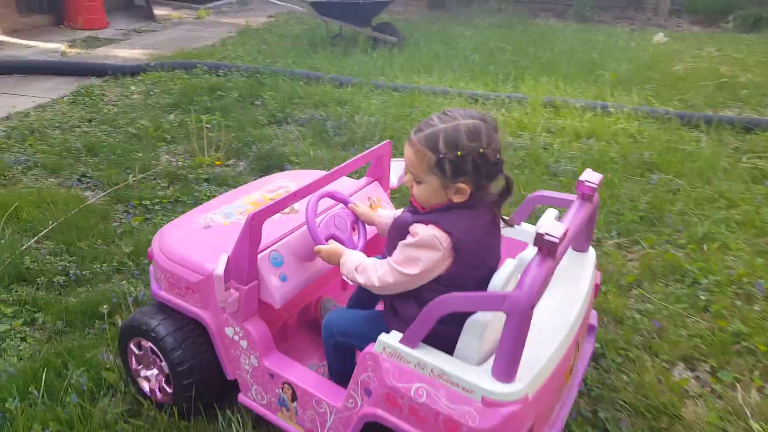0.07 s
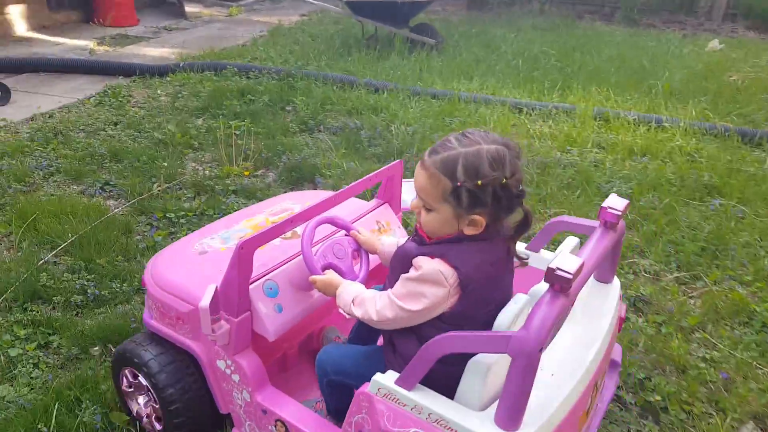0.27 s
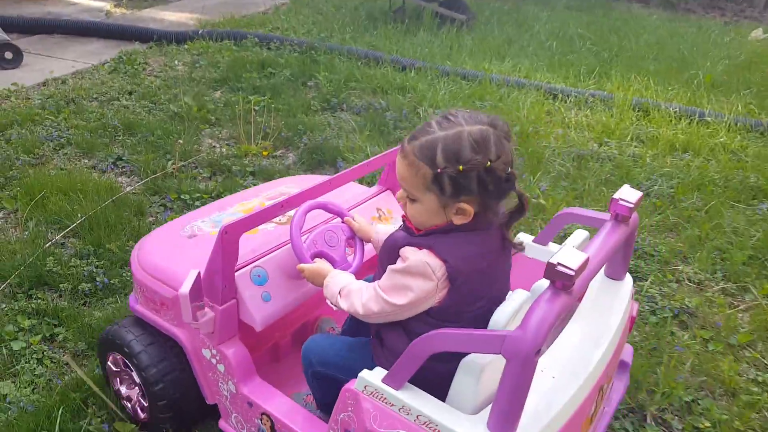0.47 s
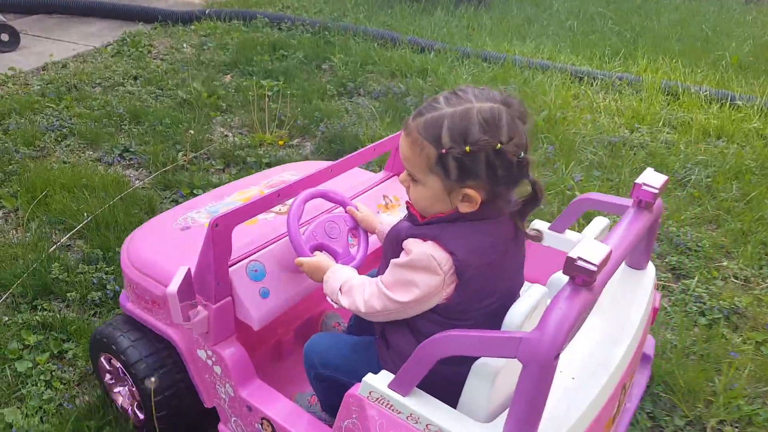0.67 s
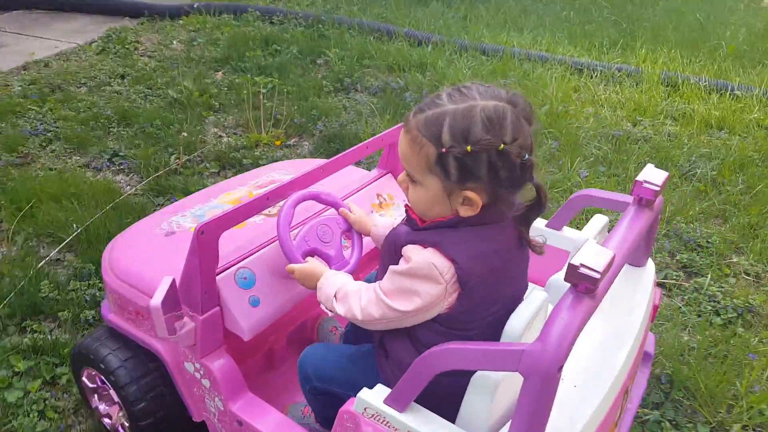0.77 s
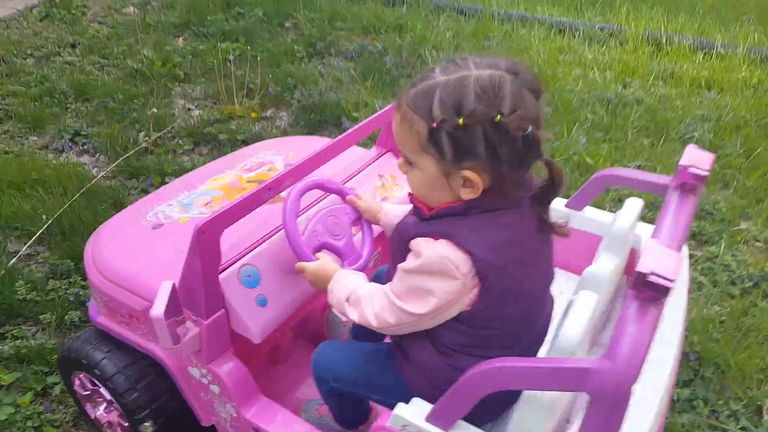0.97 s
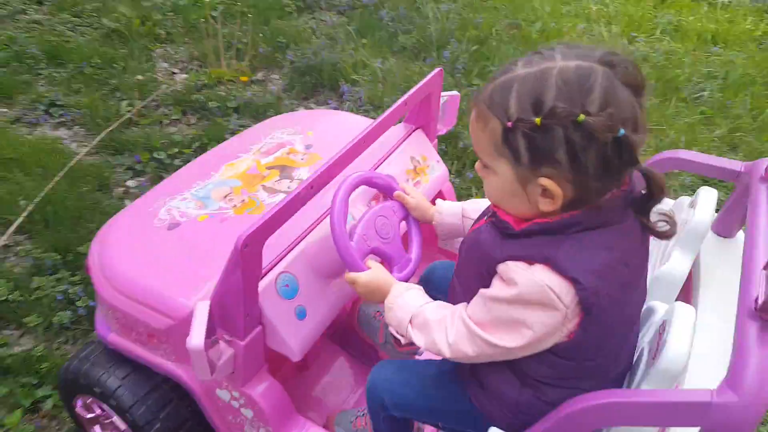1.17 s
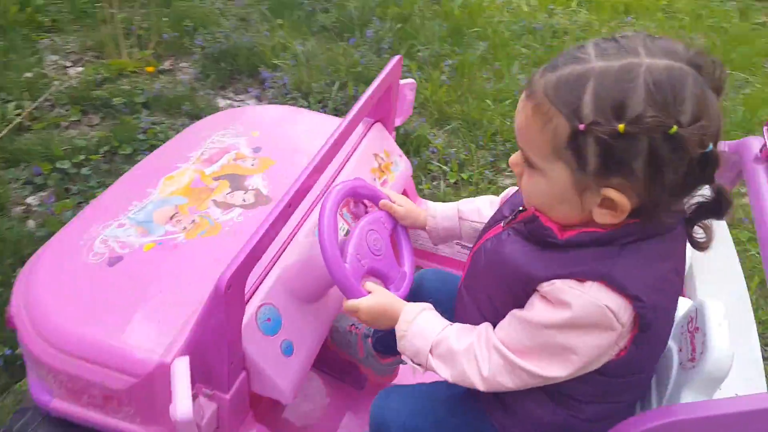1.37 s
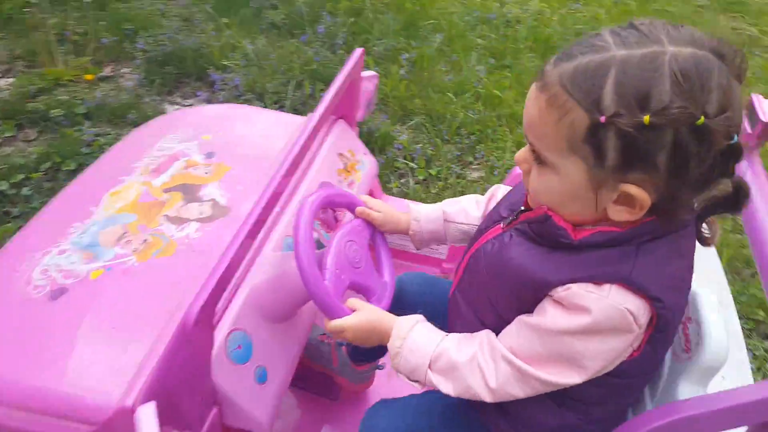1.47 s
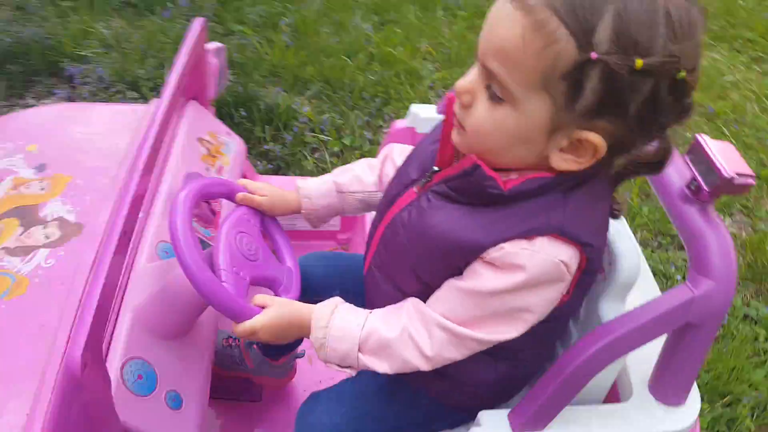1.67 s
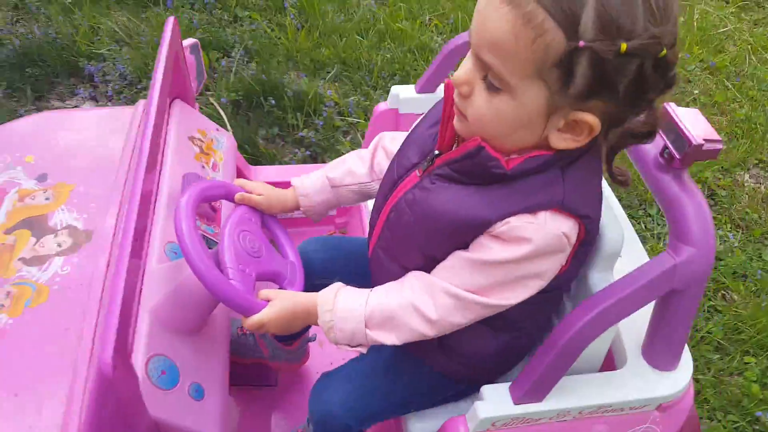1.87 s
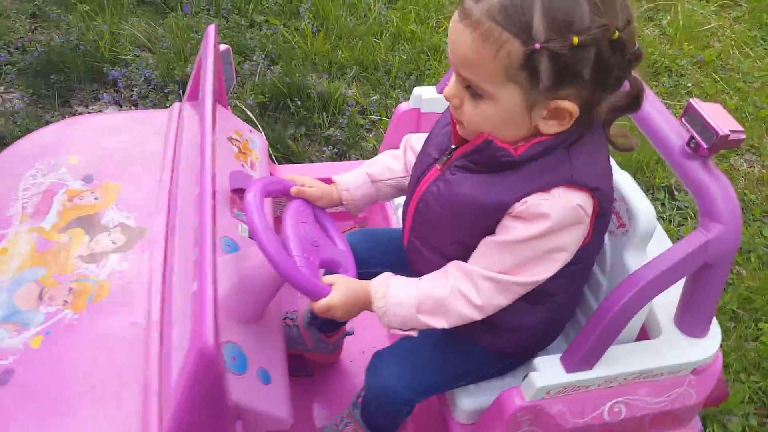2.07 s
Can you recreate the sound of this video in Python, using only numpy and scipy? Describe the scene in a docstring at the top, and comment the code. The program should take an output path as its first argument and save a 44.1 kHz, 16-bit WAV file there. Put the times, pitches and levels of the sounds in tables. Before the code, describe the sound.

Close by on a lawn, an electric toy car's motors whine up and down in short spurts. It rolls to a stop with a few plastic knocks, then drives off more roughly, its hollow body thumping near the end.

```python
"""A battery ride-on toy car on a lawn, close to a stereo pair of microphones in faint outdoor air.
First, five short jabs make its two motors whirr up and coast down: each gearbox whines at two tooth
rates, its teeth rattle in the plastic shell, and the wheels rumble over the grass. The car rolls to a
halt with a few knocks. At 1.4 s it pulls away in a longer, rougher run, and near the end the hollow
plastic body thumps."""
import sys
import numpy as np
from scipy import signal
from scipy.fft import rfft, irfft
from scipy.io import wavfile

SR = 44100
rng = np.random.default_rng(int(sys.argv[2]) if len(sys.argv) > 2 else 0)


def to_wav(s):
    """Save 16-bit WAV."""
    ch = np.atleast_2d(s).T  # columns
    pcm = np.round(np.clip(ch, -1, 1) * 32767)  # PCM
    wavfile.write(sys.argv[1], SR, pcm.astype(np.int16))


N = 93800
T = np.arange(N) / SR
FREQS = np.maximum(np.fft.rfftfreq(N, 1 / SR), 1)

# jabs of power: start/s, at speed/s, release/s, top tooth rate/Hz, level/dB, slowing/s, pinion whine/dB
POWER_JABS = [(.045, .080, 0.089, 2328, -24, 0.07, 0), (.205, .258, 0.28, 2148, -26.5, .056, 1.5),
              (.365, .420, 0.47, 2044, -26, 0.069, 2), (0.527, .570, .611, 1799, -25, .075, -0.5),
              (0.699, .745, 0.77, 2052, -23.5, 0.054, 0)]


def from_db(db):
    """Decibels to gain."""
    return 10 ** (np.asarray(db) / 20)


def rms_one(x):
    """Scale to unit rms."""
    return x / np.sqrt(np.mean(x ** 2) + 1e-20)


def in_time(rows):
    """Each column of a curve, sample by sample."""
    times, *columns = np.transpose(rows)
    return [np.interp(T, times, c) for c in columns]


def at_hz(rows, hz):
    """Each column of a spectrum at the given frequencies."""
    freqs, *columns = np.transpose(rows)
    return [np.interp(np.log(hz), np.log(freqs), c) for c in columns]


def drift(rate_hz):
    """Smooth random wander of unit rms."""
    return rms_one(irfft(rfft(rng.standard_normal(N)) / (1 + (FREQS / rate_hz) ** 2), N))


def colour(x, spectrum):
    """Give a white signal a spectrum, at unit rms."""
    return rms_one(irfft(rfft(x) * from_db(at_hz(spectrum, FREQS)[0]), N))


def microphones(direct, scattered=None):
    """A sound at the close stereo pair; its scattered part differs between left and right."""
    image = [(60, 0.89, 1.5), (200, 1, 1), (500, 0.93, 1.4), (1000, 0.79, 0.5), (1770, 0.31, 5),
             (3280, 0.2, 1.5), (4870, .2, -5), (7500, .15, -2.5), (13000, 0.14, 5)]  # stereo image: f/Hz, likeness of the sides, left minus right/dB
    phase = [(200, 0), (500, -.1), (1000, -.5), (1800, -1.3), (3300, -2.8), (5000, -1.5), (13000, -1.5)]  # phase between the sides: f/Hz, left lead/rad
    (alike, pan_db), (lead,) = at_hz(image, FREQS), at_hz(phase, FREQS)
    alike, sides = np.clip(alike, 0, 1), np.array([[1], [-1]])
    pair = rfft(direct)
    if scattered is not None:
        pair = np.sqrt((1 + alike) / 2) * pair + sides * np.sqrt((1 - alike) / 2) * rfft(scattered)
    gains = from_db(sides * pan_db / 2)
    gains /= np.sqrt(np.mean(gains ** 2, axis=0))
    return irfft(pair * gains * np.exp(.5j * sides * lead), N)


def air():
    """Faint open air over the lawn, and a fine hiss that flickers in the treble."""
    air_spectrum = [(22, -32), (45, 3), (150, -6.5), (500, -16), (1500, -17.5), (4000, -21.5), (16000, -38)]  # outdoor air: f/Hz, density/dB
    air_level = [(0, -48), (.85, -49), (1.25, -44), (2.13, -51)]  # its swell: t/s, level/dB
    hiss_spectrum = [(20, -30), (3000, 2), (6000, -1.5), (9000, -3.5), (12000, -2.5), (16000, -10)]  # treble hiss: f/Hz, density/dB
    hiss_level = [(0, -52), (.45, -52.5), (.85, -50), (1.05, -56), (1.27, -54), (1.35, -48.5), (1.6, -48.5),
                  (1.9, -46.5), (2.02, -58.5), (2.13, -45.5)]  # its swell: t/s, level/dB
    low = colour(rng.standard_normal((2, N)), air_spectrum) * from_db(in_time(air_level)[0])
    hiss = colour(rng.standard_normal((2, N)), hiss_spectrum)
    flicker_db = 1.5 * drift(25)
    return microphones(*(low + hiss * from_db(in_time(hiss_level)[0] + flicker_db)))


def shell(x):
    """The plastic shell rings at its resonances as rumble and rattle pass through."""
    resonances = [(153, 20, 0), (227, 35, 1), (446, 10, -1.5), (539, 43, 5.5), (752, 64, 4.5),
                  (1220, 54, 4), (1770, 210, 2), (2530, 85, 4.5), (2877, 60, 7), (4440, 500, 5.5),
                  (6200, 330, 3)]  # shell resonances: f/Hz, width/Hz, lift/dB
    response = 1 + sum((from_db(db) - 1) / (1 + 1j * (FREQS ** 2 - hz ** 2) / (FREQS * width))
                       for hz, width, db in resonances)
    return irfft(rfft(x) * response, N)


def wheels():
    """Hollow wheels rumble over lumpy ground."""
    rolling = [(0, -47.5), (.05, -32.5), (.09, -32.5), (.18, -35), (.22, -28.5), (.30, -28.5), (.37, -33),
               (.45, -28.5), (.52, -34), (.62, -29.5), (.70, -36), (.76, -29.5), (.90, -32.5),
               (1.02, -40.5), (1.20, -45), (1.40, -48.5), (1.46, -32.5), (1.78, -33.5), (1.86, -36.5),
               (1.91, -25.5), (1.99, -27.5), (2.12, -36)]  # rumble of wheels and body: t/s, level/dB
    spectrum = [(22, -38), (42, -22), (80, -7), (120, -4.5), (160, 1), (205, 0), (270, -4), (400, -2),
                (600, -12), (1200, -14.5), (2200, -24), (5000, -43)]  # its colour: f/Hz, density/dB
    lumps = rng.standard_normal((2, N)) * from_db(2.35 * drift(40))
    rumble = colour(lumps, spectrum) * from_db(in_time(rolling)[0])
    return microphones(*shell(rumble))


def fizz():
    """Fine, bright plastic rattle as each jab reaches full speed."""
    spectrum = [(2000, -30), (5000, -1), (9000, -2), (13000, 0), (16000, -8)]  # plastic fizz: f/Hz, density/dB
    level_db, half_length_s = -46, 0.023
    swell = sum(np.exp(-((T - full - half_length_s / 2) / half_length_s) ** 2)
                for _, full, *_ in POWER_JABS)
    noise = colour(rng.standard_normal((2, N)), spectrum)
    return microphones(*(noise * swell * from_db(level_db + 2.9 * drift(200))))


def gear_squeals():
    """Brief high gear whine as the motors slow: short, unsteady falling tones, dead centre."""
    glides = [(.476, 0.0198, 3000, 2730, -25.5), (1.791, .055, 4820, 4350, -37.5)]  # gear squeals: t/s, length/s, start f/Hz, end f/Hz, level/dB
    out = np.zeros(N)
    for start, length, start_hz, end_hz, db in glides:
        progress = np.clip((T - start) / length, 0, 1)
        hz = (start_hz + (end_hz - start_hz) * progress) * (1 + .025 * drift(270))
        out += from_db(db) * np.sin(np.pi * progress) * np.sin(2 * np.pi * np.cumsum(hz) / SR)
    return out


def knocks():
    """Jolts ring the hollow body; softer contacts reach fewer of its modes."""
    jolts = [(.066, -21.5, 2480), (.237, -25.5, 704), (0.4193, -17.5, 1502), (0.4244, -23, 1230),
             (0.44, -36, 400), (0.985, -29.5, 1990), (1.124, -32.5, 690), (1.137, -29.5, 200),
             (1.2256, -25, 600), (1.431, -24.5, 1500), (1.9215, -11, 1109), (1.933, -21.5, 200.2)]  # knocks of the body: t/s, level/dB, contact brightness/Hz
    modes = [(88, -28, 0.12), (161, -1.5, 0.21), (235.4, -7, 0.12), (344, -6, 0.064), (462, 3.5, 0.032),
             (698, -15.5, 0.15), (883, -4.5, 0.048), (1054, -10, 0.025), (1340, -3, 0.028),
             (1684, -11, 0.046)]  # body modes: f/Hz, level/dB, t60/s
    crack_db, crack_s = -6, 0.0095
    out = np.zeros(N)
    for start, db, bright_hz in jolts:
        onset = int(start * SR)
        t = T[:min(N - onset, SR // 3)]
        ring = 0
        for k, (hz, mode_db, t60) in enumerate(modes):
            envelope = from_db(mode_db + rng.normal(0, 1) - 60 * t / t60)
            ring += (-1) ** (k // 2) * envelope * np.sin(2 * np.pi * hz * t)
        crack = from_db(crack_db) * rng.standard_normal(len(t)) * np.exp(-t / crack_s)
        contact = signal.butter(1, min(bright_hz, SR / 3), fs=SR)
        out[onset:onset + len(t)] += from_db(db) * signal.lfilter(*contact, ring + crack)
    low_cut = signal.butter(2, 87, "high", fs=SR, output="sos")  # the knocks carry little deep bass
    return microphones(signal.sosfilt(low_cut, out))


def gearbox(tooth_hz, pinion_db, long_run):
    """Whine of the pinion and the slower gear, and the force of the slower gear's uneven tooth blows."""
    pinion_whine = [(1, -2.5, -3), (2, -6, -9), (3, -24.5, -21)]  # pinion tones: harmonic, in the jabs/dB, in the long run/dB
    slow_whine = [(1, -5.5, -2), (2, -20, -17.5), (3, -33, -20)]  # slower gear's tones: harmonic, in the jabs/dB, in the long run/dB
    housing = [(200, -12), (350, -4.5), (440, 0.5), (560, -6), (720, 1), (900, -1), (1050, -2.5),
               (1270, -2.5), (1450, 1), (1900, 3), (2350, -1), (2920, 9.5), (3400, -5), (3900, -9),
               (4600, -4), (5600, 4), (9000, 2.5)]  # the housing favours some tones: f/Hz, gain/dB
    gear_ratio, pinion_teeth, eccentricity = 4.32, 12, 0.2
    speed_wobble, jitter_teeth, flutter_db = .008, .03, 3.5
    blow_spread_db, blow_decay_s = 4, 0.001
    hz = tooth_hz * (1 + speed_wobble * drift(40))
    teeth = np.cumsum(hz) / SR + rng.uniform(0, 100) + jitter_teeth * drift(250)
    whine = 0
    for ratio, harmonics, gear_db in ((1, pinion_whine, pinion_db), (gear_ratio, slow_whine, 0)):
        for k, jab_db, run_db in harmonics:
            wobble = 1 + eccentricity * np.sin(2 * np.pi * (teeth / ratio / pinion_teeth + rng.random()))
            db = gear_db + (run_db if long_run else jab_db)
            db = db + at_hz(housing, k * hz / ratio)[0] + flutter_db * drift(23)
            whine += from_db(db) * wobble * np.sin(2 * np.pi * k * teeth / ratio)
    slow_tooth = np.floor(teeth / gear_ratio)
    meshing = np.diff(slow_tooth, prepend=slow_tooth[0]) > 0
    blows = meshing * from_db(blow_spread_db * np.clip(rng.standard_normal(N), -2, 2))
    return whine, signal.lfilter([1], [1, -np.exp(-1 / (blow_decay_s * SR))], blows)


def drive(tooth_rates, gain, pinion_db, rattle_spectrum, rattle_db, second_motor_db, long_run):
    """Two gearboxes whine, and their tooth blows rattle through the plastic shell."""
    (whine_a, blows_a), (whine_b, blows_b) = [gearbox(hz, pinion_db, long_run) for hz in tooth_rates]
    force = blows_a + blows_b + 0.62  # a steady bed under the blows
    force /= np.sqrt(np.average(force ** 2, weights=gain ** 2))
    noise = rng.standard_normal((2, N)) * force
    rattle = colour(noise, rattle_spectrum) * noise.std() * from_db(rattle_db)
    left, right = microphones(gain * from_db(second_motor_db) * whine_b)
    right_lead_s = 0.000082  # the second motor sits across the axle
    second_whine = np.array([left, np.interp(T + right_lead_s, T, right)])
    return microphones(*shell(gain * rattle)) + microphones(gain * whine_a) + second_whine


def jab_motion():
    """Tooth rate, gain and pinion whine (dB) as the motors spin up and coast; loudness follows speed."""
    coast_s, creep_hz, loudness_power = 0.071, 516.4, 0.78
    whine_power, spin_up_db, slack_s = 0.64, -8.5, 0.0077
    fade = np.exp(-np.maximum(T - .05, 0) / coast_s)  # the motors already turn slowly at the start
    tooth_hz, gain, pinion_db = 933.3 * fade, from_db(-33.5) * fade, np.zeros(N)
    for start, full, release, top_hz, db, slowing_s, whine_db in POWER_JABS:
        rising = np.interp(T, [start - coast_s, start, full], [0, creep_hz / top_hz, 1])
        speed_share = rising * np.exp(-np.maximum(T - release, 0) / slowing_s)
        # the pinion sings most near full speed, once the slack is taken up
        slack = np.clip((full - T) / slack_s, 0, 1)
        singing_db = whine_db + whine_power * 20 * np.log10(speed_share + 1e-6) + spin_up_db * slack
        pinion_db = np.where(top_hz * speed_share > tooth_hz, singing_db, pinion_db)
        tooth_hz = np.maximum(tooth_hz, top_hz * speed_share)
        gain = np.maximum(gain, from_db(db) * speed_share ** loudness_power)
    return np.maximum(tooth_hz, 20), gain, pinion_db


def motors():
    """Two motors turn the gears: nearly in step for five jabs, then straying apart in the long run."""
    jab_rattle = [(60, -39), (160, -2), (260, -5), (480, 0), (780, -5), (1000, -7), (1400, -3.5),
                  (2000, -3.5), (2900, -8), (3600, -15.5), (5500, -21.5), (8000, -29), (12000, -26),
                  (16000, -40)]  # tooth rattle in the jabs: f/Hz, density/dB
    run_rattle = [(60, -10.5), (160, 5.5), (280, -4), (450, -4.5), (760, 3), (1020, -8), (1400, 0.5),
                  (2000, -2.5), (2900, -7.5), (3600, -17.5), (5500, -23), (8000, -27), (12000, -32.5),
                  (16000, -43)]  # tooth rattle in the long run: f/Hz, density/dB
    run_speed = [(1.42, 1095, 1086), (1.45, 1268, 1243), (1.485, 1474, 1443), (1.515, 1763, 1553),
                 (1.555, 1899, 1574), (1.62, 1904, 1470), (1.66, 1878, 1555), (1.70, 1896, 1690),
                 (1.745, 1875, 1838), (1.785, 1927, 2049), (1.83, 1875, 1630), (1.90, 1311, 1189),
                 (2.02, 1404, 1354), (2.13, 911, 841)]  # tooth rates in the long run: t/s, first motor/Hz, second motor/Hz
    run_effort = [(1.40, -73, -3), (1.425, -44, -6), (1.445, -28, 7), (1.50, -27, -2.5), (1.57, -25, -0.5),
                  (1.66, -24.5, -1.5), (1.74, -23, -2.5), (1.79, -22, -5), (1.815, -29.5, -6),
                  (1.855, -33, -17), (1.89, -28, -26), (1.965, -43, -24), (1.995, -30, -11),
                  (2.03, -31, -10), (2.065, -40.5, -6), (2.13, -41, -9)]  # effort in the long run: t/s, level/dB, pinion whine/dB
    tooth_hz, jab_gain, jab_pinion_db = jab_motion()
    jabs = drive([tooth_hz, tooth_hz * 0.97], jab_gain, jab_pinion_db, jab_rattle,
                 rattle_db=-2.5, second_motor_db=-4, long_run=False)
    effort_db, run_pinion_db = in_time(run_effort)
    run = drive(in_time(run_speed), from_db(effort_db), run_pinion_db, run_rattle,
                rattle_db=0, second_motor_db=0.5, long_run=True)
    return jabs + run


def scene():
    """The car on the lawn, from close by."""
    return motors() + fizz() + gear_squeals() + wheels() + knocks() + air()


def record(dry):
    """The recorder rounds the peaks and cuts the top steeply."""
    peak_limit, cutoff_hz = 0.5, 15700
    rounded = peak_limit * np.tanh(dry / peak_limit)
    return irfft(rfft(rounded) * np.clip((cutoff_hz - FREQS) / 200 + .5, 0, 1), N)


dry = scene()
out = record(dry)
to_wav(out)
```